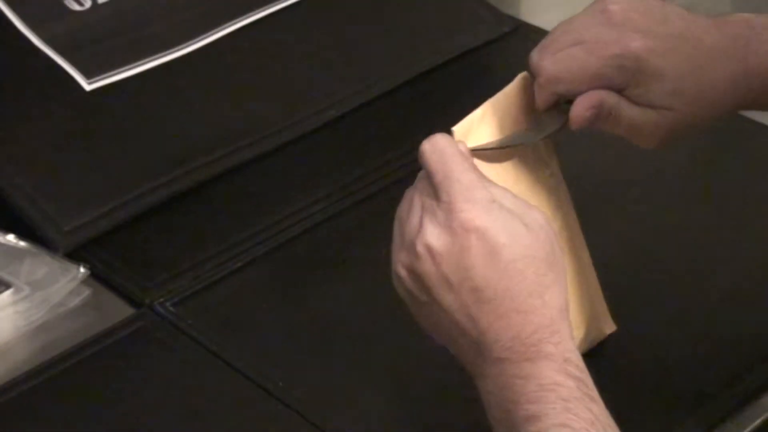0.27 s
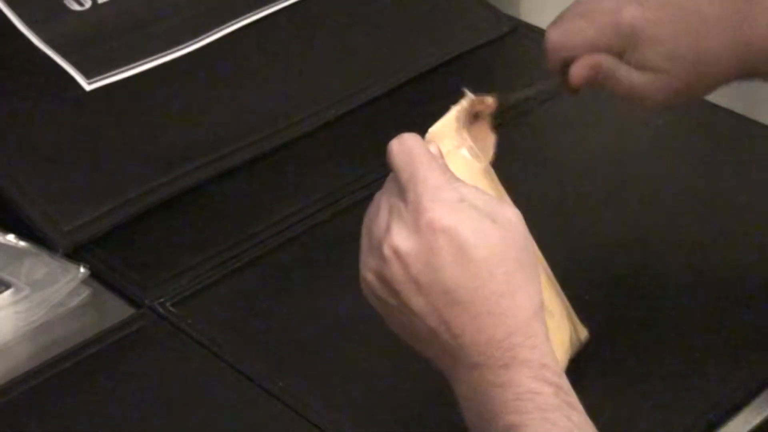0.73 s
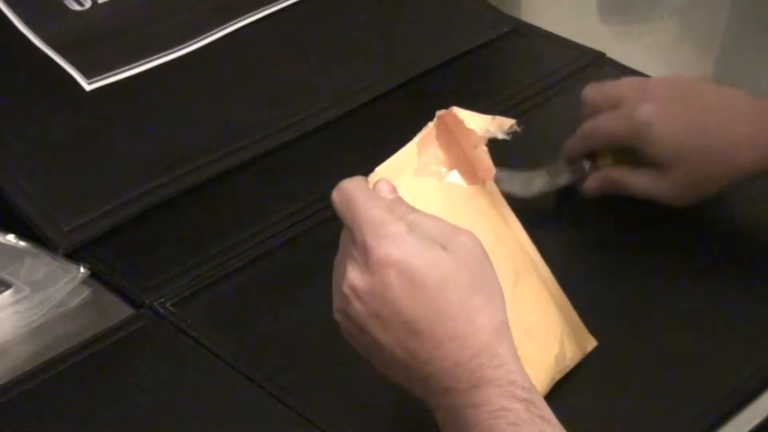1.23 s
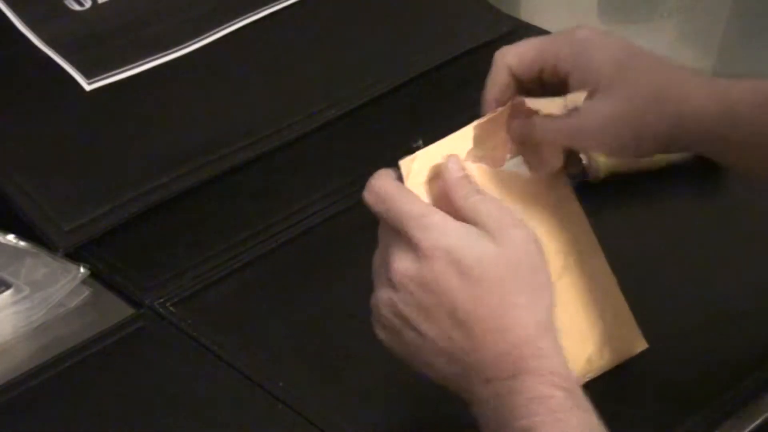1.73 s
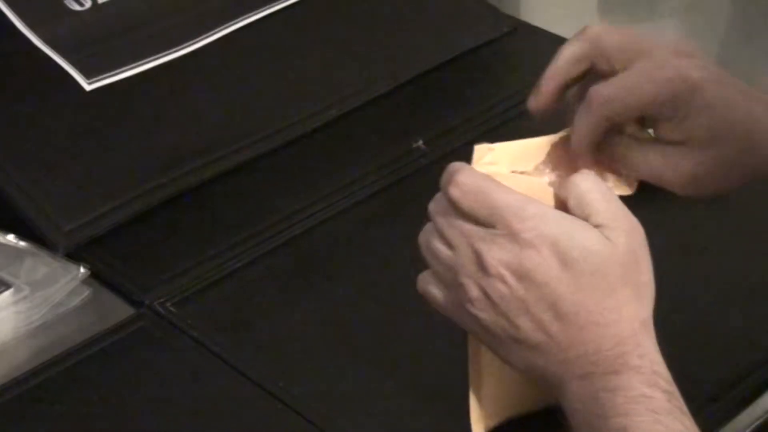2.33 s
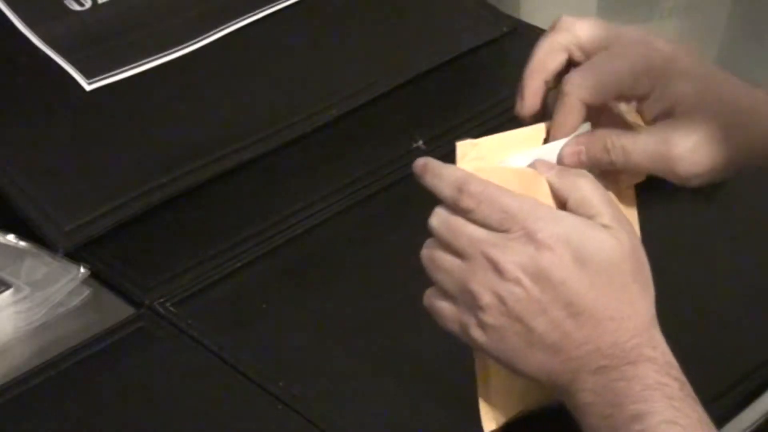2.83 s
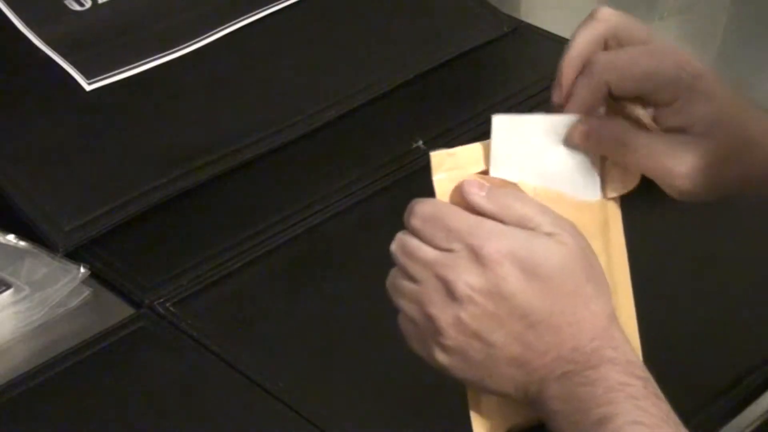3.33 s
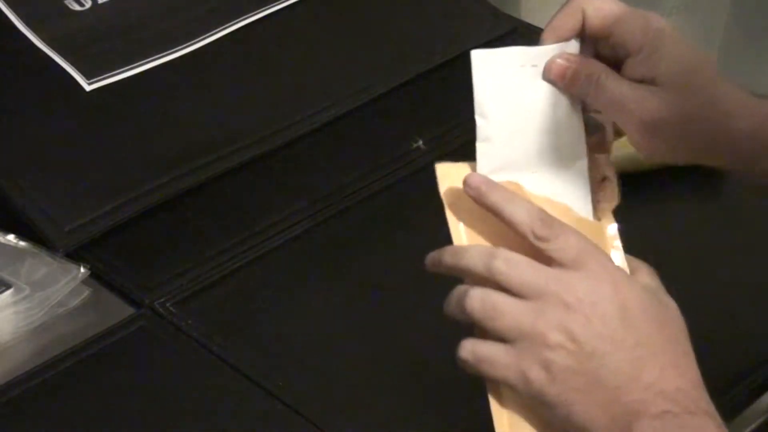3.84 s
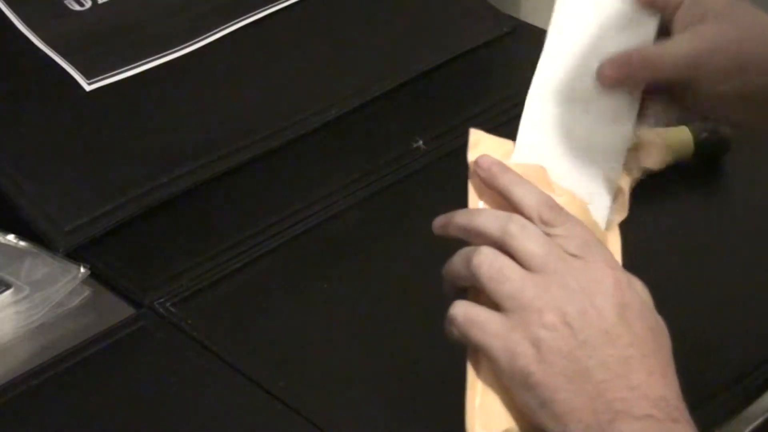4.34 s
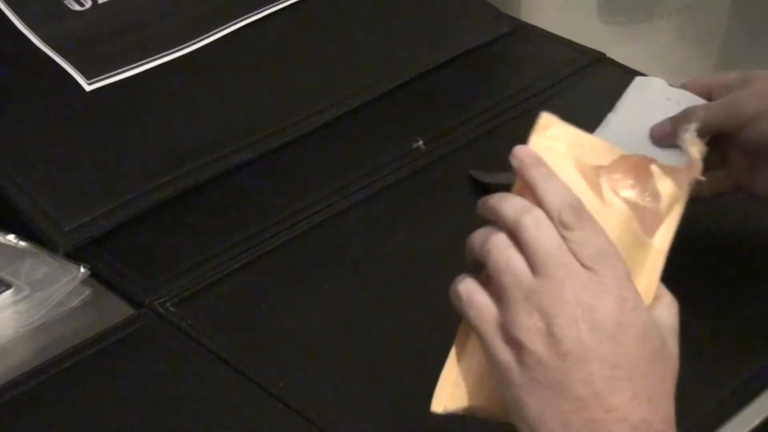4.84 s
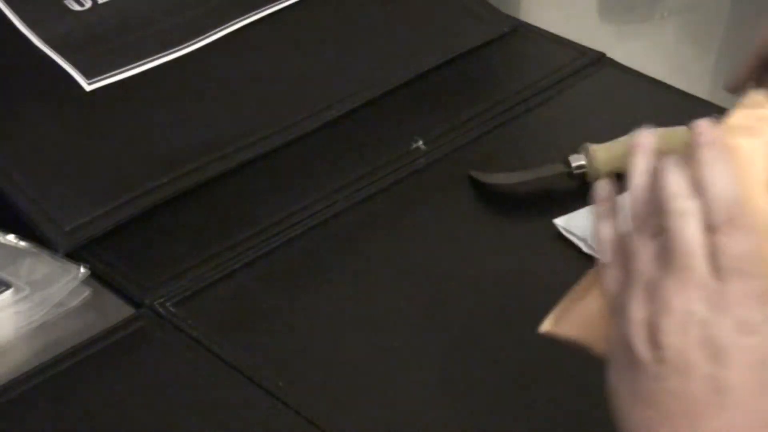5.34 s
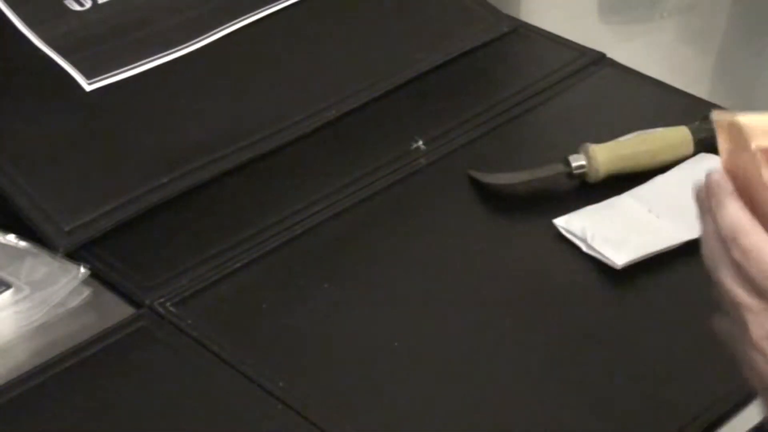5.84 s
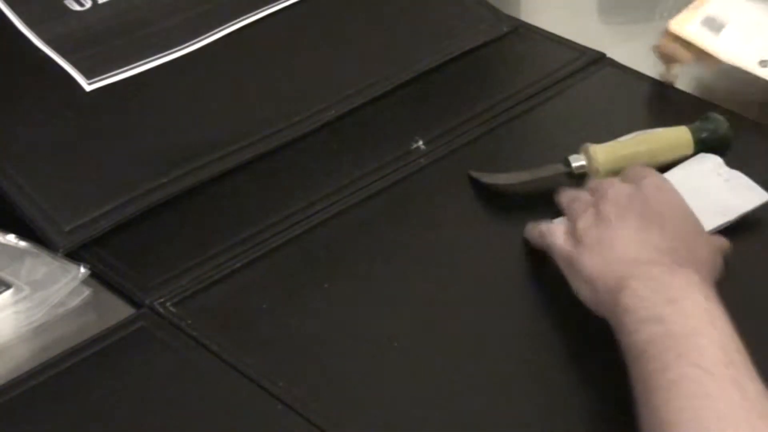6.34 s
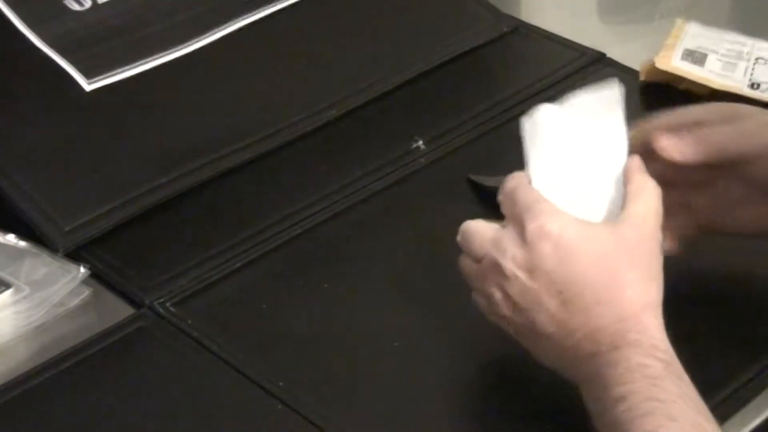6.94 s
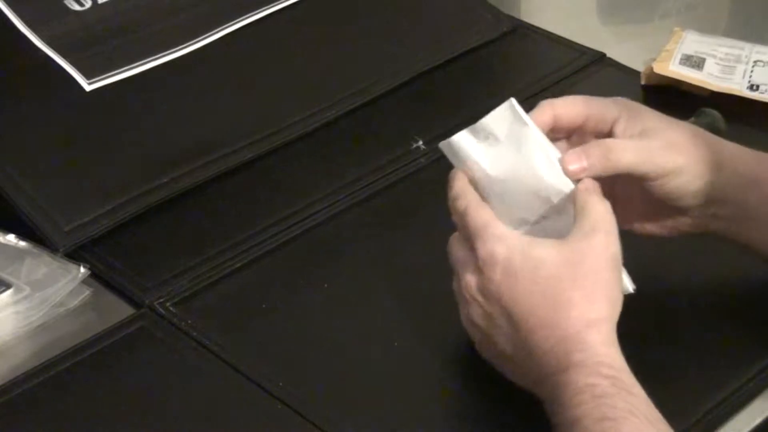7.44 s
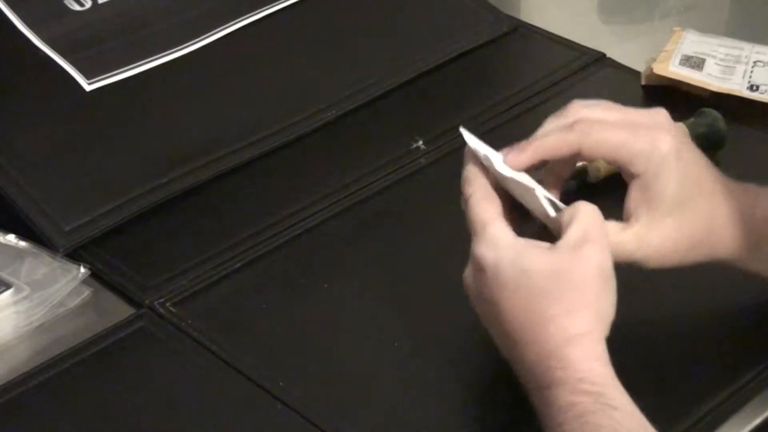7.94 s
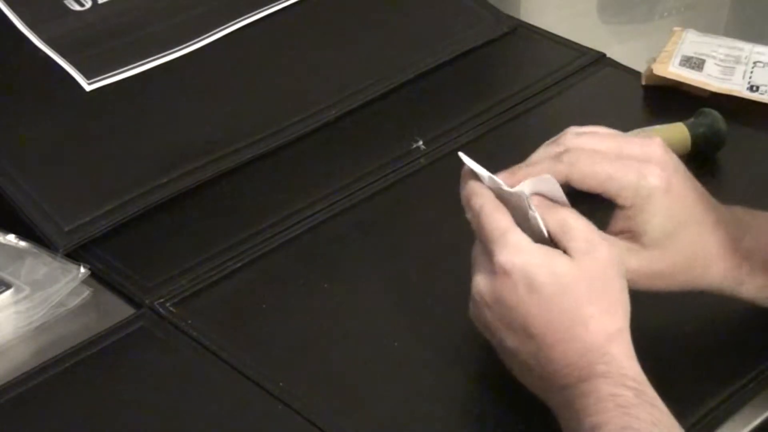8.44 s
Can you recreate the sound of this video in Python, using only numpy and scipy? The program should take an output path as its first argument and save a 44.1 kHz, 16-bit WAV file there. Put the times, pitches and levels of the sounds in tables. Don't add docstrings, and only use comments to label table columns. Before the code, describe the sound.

Close dry tearing of thick paper, a small dull knife knock, scratchy rustling as a packet is pulled free, then sparse crisp paper crackles indoors.

```python
import sys
import numpy as np
from scipy import signal
from scipy.fft import rfft, irfft, next_fast_len
from scipy.io import wavfile
from scipy.ndimage import uniform_filter1d

SR = 44100
rng = np.random.default_rng(int(sys.argv[2]) if len(sys.argv) > 2 else 0)


def convert_level_to_amplitude(level_db):
    exponent = np.asarray(level_db, float) / 20
    return 10 ** exponent


def bounce(signal):
    frames = np.transpose(np.atleast_2d(signal))
    limited = np.clip(frames, -1, 1)
    pcm = np.round(limited * 32767).astype(np.int16)
    wavfile.write(sys.argv[1], SR, pcm)


N = 382624
SWAP_S = 4.54

# top_s, fizz_db, swell_s, fade_s, bend_db
SLIT_STROKES = [(0.032, -45.5, 0.035, 0.047, 3.5), (0.054, -54.5, 0.026, 0.56, 4),
                (0.12, -47.5, 0.0073, 0.014, -2), (0.31, -43.5, 0.026, 0.038, -2),
                (0.412, -33.5, 0.028, 0.053, 1), (0.445, -37.5, 0.052, 0.051, 4),
                (0.555, -45, 0.042, 0.071, -20), (0.645, -31, 0.039, 0.08, -4),
                (0.741, -21, 0.13, 0.099, 2.5), (0.776, -48, 0.529, 0.089, -5), (0.87, -54, 0.05, 0.15, 1),
                (1.143, -68, 0.19, 0.058, -12.8), (1.213, -61, 0.012, 0.3, 7),
                (1.37, -61.5, 0.062, 0.034, 12), (1.503, -62.5, 0.008, 0.28, 8)]
PULL_STROKES = [(1.778, -47, 0.1, 0.076, -6), (1.854, -49, 0.013, 0.53, -33),
                (1.969, -39, 0.0066, 0.018, -23), (2.032, -55, 0.013, 0.03, -14.0),
                (2.09, -45, 0.013, 0.14, -17), (2.214, -50, 0.52, 0.3, 9.5),
                (2.253, -39.5, 0.031, 0.054, 8.5), (2.414, -57.5, 0.037, 0.18, 15.5),
                (2.46, -39.5, 0.06, 0.051, -22), (2.652, -44, 0.13, 0.054, 1.5),
                (2.775, -41, 0.057, 0.036, -12), (2.81, -41.5, 0.14, 0.046, 8.5),
                (2.917, -38, 0.021, 0.053, -11), (3.037, -35, 0.15, 0.098, 4.5),
                (3.197, -44.5, 0.19, 0.04, 1.5), (3.285, -38.5, 0.042, 0.34, -1.5),
                (3.562, -39, 0.14, 0.057, -2.5), (3.691, -38.5, 0.015, 0.03, -27.5),
                (3.771, -57, 0.6, 0.0087, 18), (3.992, -38, 0.14, 0.056, -1.5),
                (4.125, -45, 0.83, 0.069, 5), (4.292, -38.5, 0.085, 0.12, 1),
                (4.409, -40, 0.098, 0.069, -8), (4.529, -49, 0.037, 0.033, -3)]
UNFOLD_STROKES = [(4.575, -53.5, 0.06, 0.022, 8), (4.767, -55, 0.31, 0.77, 9),
                  (4.968, -52, 0.0072, 0.16, -17), (5.15, -51, 0.025, 0.024, -3),
                  (5.172, -42.5, 0.027, 0.078, 11.5), (5.254, -49.5, 0.01, 0.067, 5.5),
                  (5.37, -74.5, 0.0082, 0.069, 3.5), (6.029, -63, 0.34, 0.66, 7),
                  (6.037, -71, 0.27, 0.03, 15), (6.537, -52.5, 0.27, 0.288, 7),
                  (6.623, -45.5, 0.053, 0.049, 8.5), (6.666, -47.5, 0.008, 0.069, -5),
                  (6.983, -54.5, 0.046, 0.48, 3), (7.113, -51.5, 0.031, 0.06, -1),
                  (7.368, -51.5, 0.032, 0.062, 6), (7.513, -51, 0.071, 0.063, 1),
                  (7.707, -62.5, 0.24, 0.6, 11), (7.785, -51.5, 0.059, 0.033, -11),
                  (7.876, -51.5, 0.028, 0.072, 5), (8.017, -54, 0.063, 0.083, 7),
                  (8.136, -50, 0.049, 0.075, 8.5), (8.215, -49, 0.056, 0.032, -16),
                  (8.252, -45, 0.042, 0.35, 3), (8.345, -38, 0.0053, 0.065, 4.5),
                  (8.501, -46.5, 0.013, 0.048, 11), (8.688, -53, 0.27, 0.539, 5.5)]

# low_hz, high_hz
ZONES_HZ = [(5000, 20000), (1500, 5000), (170, 1500)]
ZONE_DB = [0.84, -4.5, -11.5]
ZONE_BEND = [0.0, 0.41, 1.11]
# freq_hz, density_db
ENVELOPE_COLOUR = [(71, -86), (120, -12.5), (436, -4.5), (524, -8.5), (592, 0), (712, -4), (789, 0),
                   (1400, -1.5), (2430, -8.5), (2870, -5.5), (5300, -10), (8400, -5), (10400, -14),
                   (16000, -23)]
# freq_hz, density_db
PACKET_COLOUR = [(120, -30), (200, -8.5), (316, -19), (387, -7), (529, -11), (806, -5), (1060, -7),
                 (1620, 0), (3430, -1), (4400, -4.5), (5900, -2.5), (8270, -0.5), (14600, -23.5),
                 (16000, -31)]

# start_s, fizz_peak_db, body_re_fizz_db, # panel_hz, crackle_db
ENVELOPE_SNAPS = [(.403, -14, -18.5, 2160, 0.5), (.7113, -12, -20, 2840, -3), (1.2181, -43, -20, 821, -12),
                  (1.3622, -53.5, 4, 2140, -19), (1.5075, -37, -9.5, 1520, -6.5),
                  (1.6495, -39, -17, 2400, -10), (2.2358, -37, -2, 1030, -4), (2.4528, -28, -15, 770, -8),
                  (3.0132, -19, -6, 2180, -4.5), (3.1394, -40, -6, 1660, -1),
                  (3.1887, -26, -11.5, 584, -23), (3.3523, -21.5, -7, 1250, -12.5),
                  (3.4994, -35.5, -7, 1000, -2.5), (3.6194, -49.5, 16.5, 1720, -17),
                  (3.9644, -23.5, -2.5, 1340, -10), (3.9672, -22, -6.5, 4800, -8),
                  (4.2745, -27.5, -3.5, 2920, -10.5)]
PACKET_SNAPS = [(4.562, -26.5, -11, 1320, -5.5), (4.5705, -32.5, -9, 1010, -8),
                (4.6386, -32, -8.5, 2170, -13), (4.734, -17, -13, 2130, -3), (4.803, -25, -8.5, 1120, -2),
                (4.957, -44, -13, 3200, -14), (4.9703, -20, -18, 2040, 0), (5.1621, -28.5, -7.5, 1760, 0.5),
                (5.255, -39.5, -29, 1590, 10.5), (5.272, -52, 4.5, 1580, 0),
                (5.3729, -28.5, -12.5, 1820, -1), (5.4259, -52, 10, 1040, -5.5),
                (5.8115, -50, -0.5, 825, 0.5), (5.9024, -49.5, -2.5, 1070, 1), (5.953, -40, -10.5, 860, -2),
                (5.9997, -30.5, -6, 1040, -6.5),
                (6.3943, -38, -9, 2210, -15), (6.409, -56, 0, 1210, -19), (6.534, -42.5, 3, 1630, -6),
                   (6.6029, -42, 0, 1740, -4), (6.665, -20.5, -40, 3960, -8.5), (6.878, -63, 11, 940, -11),
                   (7.0578, -38, -4.5, 1260, -9), (7.366, -52, -3, 3400, -2), (7.372, -41, -4.5, 1100, -13),
                   (7.6897, -48.5, 1, 1180, -6), (8.0082, -38.5, -1, 1700, -4.5),
                   (8.1036, -26.5, -15, 4320, -10), (8.2353, -18, -12, 1950, -5),
                   (8.3397, -5.5, -19.5, 4750, -6), (8.4964, -43, -15, 2440, 6),
                   (8.6458, -20.5, -9, 1690, -2)]

# start_s, peak_db
FIBRE_TICKS = [(0.0032, -45), (0.0144, -32), (0.0975, -41), (0.1048, -43), (0.1157, -28), (0.1212, -39),
               (0.1351, -40), (0.1549, -32), (0.1976, -40), (0.2066, -29.5), (0.2349, -49), (0.2525, -36),
               (0.2767, -40), (0.2914, -36), (0.3008, -32), (0.3257, -37), (0.3565, -29), (0.3643, -30),
               (0.5036, -26), (0.5116, -32), (0.5406, -37), (0.5475, -44), (0.5564, -23), (0.5719, -26),
               (0.5855, -28), (0.5953, -23), (0.6096, -18), (0.6246, -15), (0.6509, -35), (0.6563, -21),
               (0.6648, -10), (0.675, -19), (0.685, -17), (0.6986, -18), (0.7117, -13), (0.7225, -11),
               (0.728, -10), (0.734, -28), (0.7474, -18), (0.7595, -7), (0.7673, -19), (0.7754, -4),
               (0.78, -10), (0.8082, -26), (0.8133, -12), (0.8198, -22), (0.8339, -20), (0.8375, -28),
               (0.8509, -29), (0.8638, -33), (0.8707, -33), (0.8761, -36), (0.908, -27), (1.0285, -36),
               (1.1366, -38),
               (1.7115, -31), (1.7149, -41), (1.7372, -30), (1.7458, -34), (1.754, -34), (1.7643, -19.5),
              (1.7706, -19.5), (1.8089, -35), (1.8197, -26), (1.85, -21), (1.8975, -41), (1.901, -39),
              (1.9092, -35), (1.9167, -38), (1.9359, -25), (1.9468, -35), (1.971, -19.5), (1.9757, -36),
              (1.9852, -29), (1.9991, -26), (2.044, -30), (2.0484, -39), (2.0641, -31), (2.0818, -17),
              (2.0895, -27), (2.1046, -28), (2.1251, -28), (2.1369, -34), (2.1751, -33), (2.2886, -34),
              (2.3351, -33), (2.3739, -25), (2.385, -31.5), (2.4302, -34), (2.4393, -30), (2.4736, -24),
              (2.5099, -35), (2.6031, -29),
               (2.8705, -31), (2.9107, -31), (3.0613, -26), (3.1005, -25), (3.1583, -38), (3.1718, -36),
              (3.1986, -22), (3.2246, -39), (3.238, -33), (3.367, -43), (3.4772, -16), (3.2738, -34),
              (3.686, -39), (3.9498, -18), (4.2177, -43), (2.8952, -36), (3.545, -26.5), (3.565, -23),
              (3.6666, -36), (3.6715, -25), (3.6797, -34), (3.7136, -30.5), (3.7449, -37), (3.8551, -29),
              (4.1135, -43), (4.2317, -42), (4.517, -30), (4.5267, -37.5), (4.5802, -22), (4.5948, -42),
              (4.8476, -34), (4.8996, -41), (4.914, -36), (4.9572, -38), (5.3644, -39), (5.7857, -45),
              (5.8114, -52), (5.824, -40), (5.8694, -37.5), (5.9188, -41), (5.995, -40), (6.042, -35),
              (6.4268, -27), (6.4565, -33)]

# start_s, rms_db, centre_hz, width_hz, fade_t60_s
PANEL_POPS = [(.702, -25, 1000, 600, .02), (.726, -21, 2900, 700, 0.034), (1.79, -44.5, 453, 400, 0.096),
              (1.802, -44.5, 1170, 497, 0.061), (3.139, -38, 1280, 700, .05), (3.356, -30, 1170, 600, .08),
              (3.468, -32.5, 2980, 600, .1), (3.5, -37.5, 1075, 500, 0.065), (4.74, -34, 2080, 700, 0.05),
              (4.738, -34, 5650, 1500, 0.16), (4.803, -41, 1280, 800, 0.025), (5.175, -38, 1690, 900, .15),
              (6.358, -49, 1200, 800, 0.069), (6.408, -41.5, 1150, 503, 0.078),
              (6.6, -31, 1750, 600, 0.056), (6.712, -46, 1000, 695, 0.062), (6.97, -55.5, 1650, 300, .15),
              (7.105, -48.5, 3350, 500, .1), (7.29, -63, 3320, 250, 0.43), (7.375, -49.5, 1500, 400, 0.12),
              (7.495, -54, 3200, 400, .2), (7.69, -52, 1200, 700, 0.072), (7.87, -63, 1670, 200, 0.44),
              (8.148, -42, 8000, 1500, 0.079), (8.245, -34.5, 1730, 400, 0.07), (8.3, -48, 875, 500, 0.17),
              (8.325, -36, 745, 400, .03), (8.344, -30, 4400, 1190, 0.24)]

# start_s, peak_db, desk_hz, rattle_t60_s, handle_db
KNIFE_KNOCKS = [
    (1.321, -49, 200, 0.057, -3),
    (1.3615, -34, 244, 0.03, -0.5),
    (1.368, -35.5, 300, 0.032, -1),
    (1.5075, -39, 238, 0.04, -20),
    (1.594, -51.5, 302, 0.034, -1),
    (1.6775, -41, 295, 0.047, -9),
]
# start_s, peak_db, desk_hz, rattle_t60_s
HAND_KNOCKS = [
    (2.455, -40, 235, 0.03),
    (3.057, -38, 297, 0.022),
    (3.184, -37.5, 258, 0.018),
    (3.967, -33, 570, 0.019),
    (4.277, -43.5, 428, 0.013),
    (4.749, -32, 343, 0.011),
    (4.802, -36.5, 285, 0.019),
    (5.202, -42, 190, .035),
    (5.251, -42, 204, .04),
    (5.295, -47, 204, 0.04),
]
# freq_hz, level_db, t60_s
HANDLE_MODES = [(752, 3.5, 0.013), (890, 5, 0.0097), (1250, -12, 0.015), (454, -10, 0.015),
                (1910, -20, 0.0073)]

# freq_hz, t60_s
ROOM_T60 = [(200, 0.39), (530, 0.31), (1390, 0.25), (3680, 0.24), (9700, 0.084), (16000, 0.16)]
# freq_hz, side_re_mid_db
ROOM_SIDE = [(60, -21), (200, -19), (550, -16), (1650, -9), (5000, -7), (9000, -6), (11500, -14)]
# freq_hz, left_minus_right_db
LEAN = [(60, -3), (240, 0.5), (950, 2.5), (3770, 0.5), (15000, -1)]

# freq_hz, density_db
HUSH_COLOUR = [(15, -36), (25, -16), (64, -3.5), (84, -6), (123, -2.5), (149, -10.5), (206, -5.5),
               (575, -7.5), (1020, -12), (1100, -10.5), (1400, -14.5), (6560, -21.5), (7920, -19.5),
               (16000, -24.5)]
# freq_hz, correlation
HUSH_LIKENESS = [(60, 0.99), (240, 0.017), (950, -0.67), (3770, -0.11), (15000, 0.98)]
# freq_hz, width_hz, level_db
WHINES = [(1140, 48, -68), (6000, 260, -72)]
# time_s, level_db
WHINE_SWELL = [(0, -7), (4.5, -17), (5.4, -3), (6.1, 3), (6.5, -6), (8.68, -1)]


def rustle(per_s=3000, spread_db=3.5, clump_db=1.5, rub=0.47):
    frame_s = np.arange(0, N, 64) / SR
    levels_db = effort(frame_s)
    t = np.arange(N) / SR
    out = np.zeros(N)

    def grains():
        size = convert_level_to_amplitude(spread_db * np.minimum(rng.exponential(1, N), 5))
        return size * (rng.random(N) < per_s / SR) * rng.choice([-1, 1], N)

    shared = evened(grains())
    clumps = wander(size=200)
    for envelope, packet, db in zip(paper_zones(ENVELOPE_COLOUR), paper_zones(PACKET_COLOUR), levels_db):
        drive = 0.5 * shared + 0.65 * evened(grains()) + rub * rng.standard_normal(N)
        drive = evened(drive * convert_level_to_amplitude(clump_db * (0.17 * clumps + wander(size=500))))
        drive = drive * convert_level_to_amplitude(np.interp(t, frame_s, db))
        out += signal.oaconvolve(drive * (t < SWAP_S), envelope)[:N]
        out += signal.oaconvolve(drive * (t >= SWAP_S), packet)[:N]
    out = flexed(out)

    pocket_db = np.interp(t, frame_s, levels_db[2])
    shake_band = signal.butter(2, [70, 240], "band", fs=SR)
    shake = evened(signal.lfilter(*shake_band, rng.standard_normal(N)))
    boom_band = signal.butter(1, [330, 500], "band", fs=SR)
    boom = evened(signal.lfilter(*boom_band, grains()))
    out += boom * convert_level_to_amplitude(-34.5 + 2.2 * (pocket_db + 32)) * (t < SWAP_S)
    return out + shake * convert_level_to_amplitude(-66 + 0.42 * (pocket_db + 48))


def effort(s):
    top_s, fizz_db, swell_s, fade_s, bend_db = np.transpose(SLIT_STROKES + PULL_STROKES + UNFOLD_STROKES)[..., None]
    drop_db = 15
    shape_db = fizz_db - drop_db * np.maximum((top_s - s) / swell_s, (s - top_s) / fade_s) ** 2
    levels_db = []
    for zone_db, bend in zip(ZONE_DB, ZONE_BEND):
        power = (convert_level_to_amplitude(shape_db + zone_db + bend * bend_db) ** 2).sum(0)
        levels_db.append(10 * np.log10(power + 1e-12))
    return levels_db


def paper_zones(colour):
    hz = abs(np.fft.fftfreq(2048, 1 / SR)) + 1
    low_hz, high_hz = np.transpose(ZONES_HZ)[..., None]
    band = np.sqrt((1 + (low_hz / hz) ** 6) * (1 + (hz / high_hz) ** 6))
    log_gain = np.log(convert_level_to_amplitude(read(colour, hz)) / band + 1e-5)
    phase = -signal.hilbert(log_gain).imag
    clicks = np.fft.ifft(np.exp(log_gain + 1j * phase)).real[:, :512]
    return clicks / np.linalg.norm(clicks, axis=1, keepdims=True)


def flexed(x, patch_db=2.0):
    z = signal.stft(x, nperseg=512)[2]
    patches = rng.standard_normal(z.shape[::-1])
    patches = uniform_filter1d(uniform_filter1d(patches, size=9, axis=0), size=7, axis=1)
    gain_db = patch_db * evened(patches).T - 0.29 * patch_db ** 2 / 2
    return signal.istft(z * convert_level_to_amplitude(gain_db), nperseg=512)[1][:N]


def snaps(crack_s=0.0011, crackle_t60_s=0.097, clump_db=5.0, panel_t60_s=0.014):
    out = np.zeros(N)
    t = np.arange(6000) / SR
    papers = paper_zones(ENVELOPE_COLOUR), paper_zones(PACKET_COLOUR)
    rows = ENVELOPE_SNAPS + PACKET_SNAPS
    chance = rng.standard_normal((len(rows), 3, 3, len(t)))
    for (s, db, body_db, hz, after_db), (crack, crackle, clumps) in zip(rows, chance):
        tilt_db = -3.5 * np.log2(hz / 1250)
        sheet_db, pocket_db = body_db - tilt_db, body_db + tilt_db

        first_break = 1 + 8 * (t == 0)
        burst = np.sign(crack[0]) * np.ones((3, 1)) * np.exp(-(t / crack_s) ** 2) * first_break
        burst /= np.linalg.norm(burst, axis=1, keepdims=True)
        clumps = uniform_filter1d(clumps[0] + 1.3 * clumps, size=90)
        clumps = convert_level_to_amplitude(clump_db * evened(clumps))
        burst = burst + 0.069 * convert_level_to_amplitude(after_db - 60 * t / crackle_t60_s) * crackle * clumps

        fizz, sheet, pocket = signal.fftconvolve(burst, papers[s >= SWAP_S], axes=1)[:, :len(t)]
        body = convert_level_to_amplitude(sheet_db) * 2.95 * sheet + convert_level_to_amplitude(pocket_db) * 3.05 * pocket
        panel = ring(hz, panel_t60_s, size=1500)
        body = body + 0.036 * signal.fftconvolve(body, panel)[:len(t)]
        add(out, s, 3.12 * convert_level_to_amplitude(db) * (fizz + body))
    return signal.lfilter(*signal.butter(2, 480, "high", fs=SR), out)


def ticks(tick_s=0.00029, low_hz=7400, high_hz=12500, wide=1.0, stray_per_s=39, fray_db=-11.5, fray_t60_s=0.017):
    out = np.zeros(N)
    t = np.arange(80) / SR
    fray = np.r_[1, convert_level_to_amplitude(fray_db - 60 * np.arange(298) / SR / fray_t60_s)]
    gaps, sizes = rng.exponential(1, (400, 2)).T
    stray_s = np.cumsum(gaps) / stray_per_s
    stray_db = effort(stray_s)[0] + 3 - 1.5 * np.minimum(sizes, 2)
    listed = FIBRE_TICKS
    rows = listed + [row for row in zip(stray_s, stray_db) if row[0] < SWAP_S]
    fizz = paper_zones(ENVELOPE_COLOUR)[0, :80]
    for (s, db), chance in zip(rows, rng.random((len(listed) + 400, 300))):
        hz = low_hz * (high_hz / low_hz) ** chance[0]
        shape = chance[1:]
        pitched = np.sin(2 * np.pi * hz * t) * t * np.exp(-(t / tick_s) ** 2)
        pitched = pitched / np.linalg.norm(pitched)
        sizes = np.r_[1, (2 * shape[1:] - 1) ** 8]
        breaks = fray * np.sign(shape - 0.5) * sizes
        click = np.convolve(breaks, pitched + wide * fizz)
        add(out, s, 0.77 * convert_level_to_amplitude(db) * click / abs(click).max())
    return 1.17 * signal.lfilter(*signal.butter(2, 5600, "high", fs=SR), out)


def pops(flutter_db=-1.5, rise_s=0.0022):
    out = np.zeros(N)
    t = np.arange(8000) / SR
    chance = rng.standard_normal((len(PANEL_POPS), 2, len(t)))
    for (s, db, hz, width_hz, t60_s), (fuzz, flutter) in zip(PANEL_POPS, chance):
        band = signal.butter(2, [hz - width_hz / 2, hz + width_hz / 2], "band", fs=SR)
        drive = fuzz * convert_level_to_amplitude(flutter_db * evened(uniform_filter1d(flutter, size=130)))
        shape = np.minimum(t / rise_s, 1) * convert_level_to_amplitude(-60 * t / t60_s)
        level = convert_level_to_amplitude(db) / np.std(signal.lfilter(*band, drive))
        add(out, s, level * signal.lfilter(*band, drive * shape))
    return out


def knocks(desk_t60_s=0.022, desk_rise_s=0.004, bounce_db=5.0, bounces_per_s=45):
    out = np.zeros(N)
    t = np.arange(6000) / SR
    rows = KNIFE_KNOCKS + HAND_KNOCKS
    push = signal.windows.hann(24) / 12
    rise = 1 - np.exp(-(t[:3000] / desk_rise_s) ** 2)
    detunes = rng.uniform(0.86, 1.03, (len(rows), len(HANDLE_MODES)))
    rattles = rng.standard_normal((len(rows), len(t)))
    for (s, db, hz, t60_s, *handle_db), detune, rattle in zip(rows, detunes, rattles):
        desk = ring(hz, desk_t60_s, size=3000) + 0.27 * ring(1.67 * hz, desk_t60_s, size=3000)
        body = 3.1 * desk * rise
        if handle_db:
            body = 0.93 * body
            for (mode_hz, mode_db, mode_t60_s), k in zip(HANDLE_MODES, detune):
                body = body + convert_level_to_amplitude(mode_db + handle_db[0]) * ring(mode_hz * k, mode_t60_s, size=3000)
        if s > SWAP_S:
            body = body + convert_level_to_amplitude(-5.5) * ring(129, 0.039, size=3000)
        bounces = convert_level_to_amplitude(bounce_db * (np.cos(2 * np.pi * bounces_per_s * detune[0] * t) - 1))
        contact = (t == 0) + 0.092 * rattle * bounces * convert_level_to_amplitude(-60 * t / (2.66 * t60_s + 0.033))
        add(out, s, 1.47 * convert_level_to_amplitude(db) * signal.fftconvolve(np.convolve(body, push), contact))
    return signal.lfilter(*signal.butter(3, 118, "high", fs=SR), out)


def room(x):
    out = np.zeros((2, N))
    turn = np.arange(N) / SR * 7.0
    slots = np.arange(60, SR // 2 - 20, 12)
    for k in range(3):
        taps = np.zeros((2, SR // 2))
        at = slots + rng.integers(0, 12, (2, len(slots)))
        np.put_along_axis(taps, at, rng.choice([-1., 1.], at.shape), 1)
        hz, t, z = signal.stft(taps, SR, nperseg=128)
        decay = convert_level_to_amplitude(-60 * t / read(ROOM_T60, hz)[:, None])
        tail = signal.istft(z * decay, SR, nperseg=128)[1]
        share = np.sqrt(2 / 3) * np.cos(turn + k * np.pi / 3)
        out += signal.oaconvolve((x * share)[None], tail / np.linalg.norm(tail[0]), axes=1)[:, :N]
    side = convert_level_to_amplitude(6.0) * coloured(out[1], ROOM_SIDE)
    return np.array([out[0] + side, out[0] - side])


def hush(level_db=-57.5, patch_db=2.6):
    frames = N // 256 + 5
    hz = np.fft.rfftfreq(1024, 1 / SR)
    a, b, c, d, patches = rng.standard_normal((frames, 513, 5)).T
    patches = evened(uniform_filter1d(uniform_filter1d(patches, 10, 0), 12, 1))
    same = np.clip(read(HUSH_LIKENESS, hz), -1, 1)[:, None]
    left = a + 1j * b
    right = same * left + np.sqrt(1 - same ** 2) * (c + 1j * d)
    z = np.array([left, right]) * convert_level_to_amplitude(read(HUSH_COLOUR, hz)[:, None] + patch_db * patches)
    out = convert_level_to_amplitude(level_db) * evened(signal.istft(z, nperseg=1024, noverlap=768)[1][:, :N])
    swell_db = np.interp(np.arange(N) / SR, *np.transpose(WHINE_SWELL))
    for whine_hz, width_hz, db in WHINES:
        narrow = signal.butter(1, [whine_hz - width_hz / 2, whine_hz + width_hz / 2], "band", fs=SR)
        out += convert_level_to_amplitude(db + swell_db) * evened(signal.lfilter(*narrow, rng.standard_normal(N)))
    return out


def evened(x):
    return x / np.sqrt(np.mean(x ** 2) + 1e-20)


def read(points, hz):
    f, value = np.transpose(points)
    return np.interp(np.log(hz + 1), np.log(f + 1), value)


def add(mix, s, sound):
    part = mix[round(s * SR):][:len(sound)]
    part += sound[:len(part)]


def coloured(x, points):
    size = next_fast_len(len(x), True)
    gain = convert_level_to_amplitude(read(points, np.fft.rfftfreq(size, 1 / SR)))
    return irfft(rfft(x, size) * gain, size)[:len(x)]


def ring(hz, t60_s, size):
    t = np.arange(size) / SR
    return convert_level_to_amplitude(-60 * t / t60_s) * np.sin(2 * np.pi * hz * t)


def wander(size):
    return evened(uniform_filter1d(uniform_filter1d(rng.standard_normal(N), size), size))


def scene():
    rub = rustle()
    hits = snaps() + pops()
    blows = knocks()
    fibres = ticks()
    direct = convert_level_to_amplitude(-1.5) * rub + hits + blows + fibres
    lean = np.array(LEAN) * [1, 0.5]
    near = np.array([coloured(direct, lean), coloured(direct, lean * [1, -1])])
    send = convert_level_to_amplitude(-11.5) * rub + convert_level_to_amplitude(-9.0) * hits + convert_level_to_amplitude(-9.5) * blows + convert_level_to_amplitude(-10.0) * fibres
    return near + room(send) + hush()


def top_cut(x):
    return signal.sosfilt(signal.butter(12, 16670, fs=SR, output="sos"), x)


def record(dry):
    edge = signal.firwin(255, 15950, window=("kaiser", 8), fs=SR)
    mix = signal.oaconvolve(dry, edge[None], "same")
    return top_cut(mix)


dry = scene()
out = record(dry)
bounce(out)
```